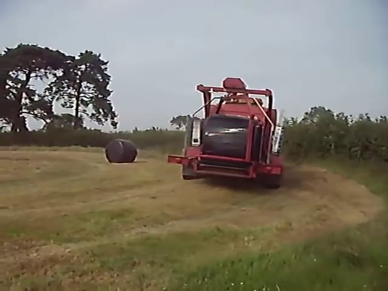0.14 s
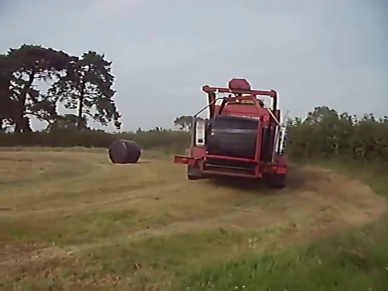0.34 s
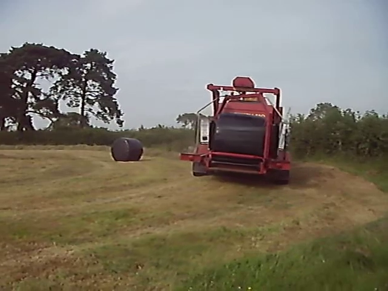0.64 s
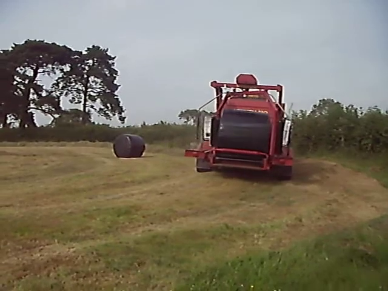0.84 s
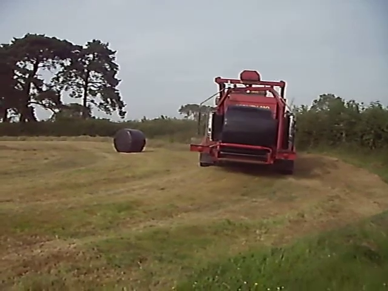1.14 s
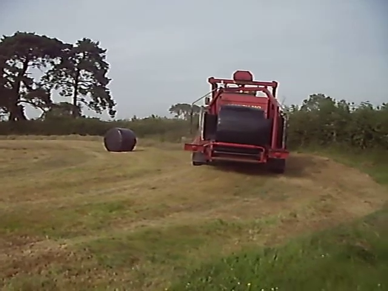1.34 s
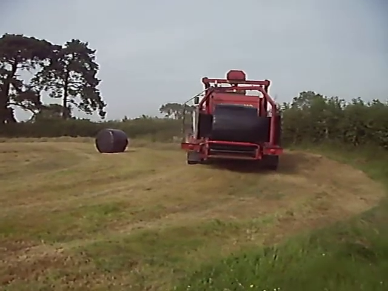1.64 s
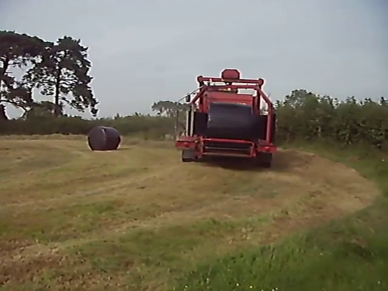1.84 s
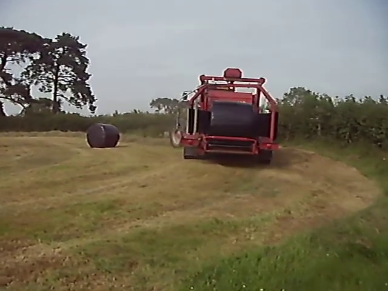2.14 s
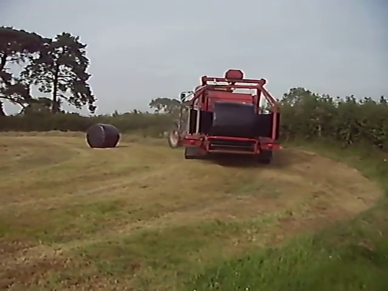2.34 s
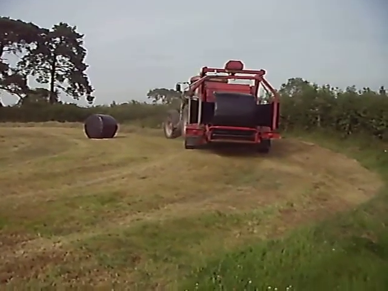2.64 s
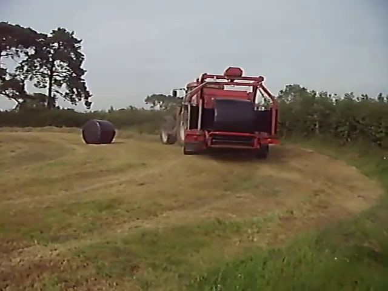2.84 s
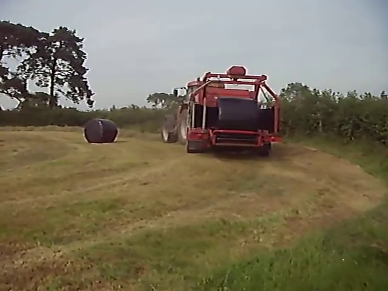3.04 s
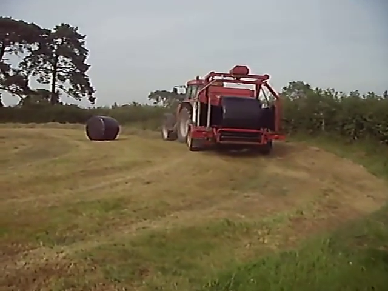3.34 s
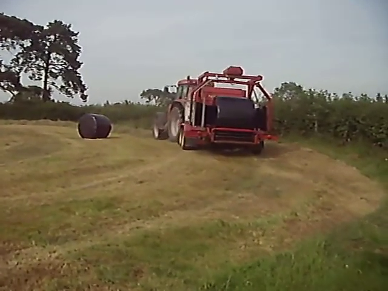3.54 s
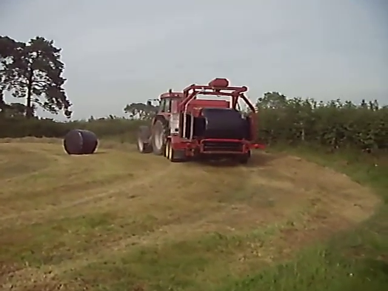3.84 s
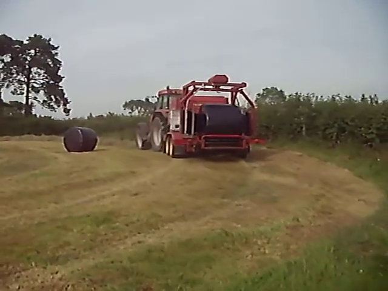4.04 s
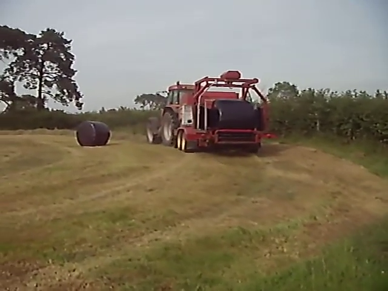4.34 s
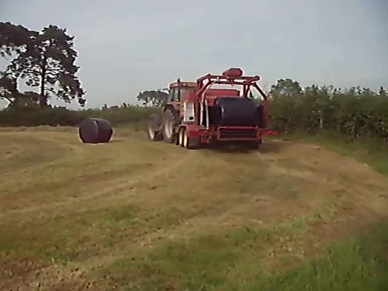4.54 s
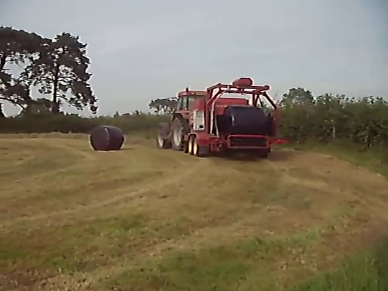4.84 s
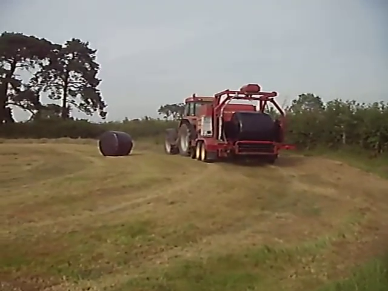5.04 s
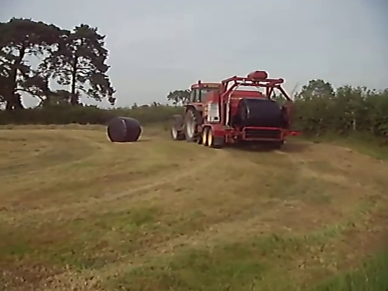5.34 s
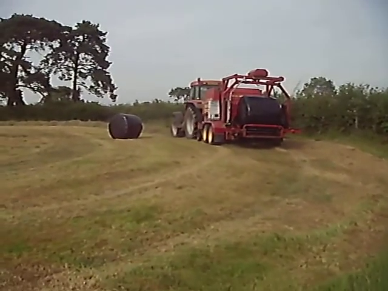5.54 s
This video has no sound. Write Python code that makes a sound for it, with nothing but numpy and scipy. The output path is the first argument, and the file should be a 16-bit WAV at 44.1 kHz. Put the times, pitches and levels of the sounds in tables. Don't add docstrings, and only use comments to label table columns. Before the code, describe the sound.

Dull, narrow-band outdoor clatter of a working baler behind a droning tractor, swamped mid-way by distorted wind buffeting, with faint squeaks late.

```python
import sys
import numpy as np
from scipy import signal
from scipy.io import wavfile
from scipy.ndimage import uniform_filter1d

SR = 44100
rng = np.random.default_rng(int(sys.argv[2]) if len(sys.argv) > 2 else 0)


def log_audio(samples):
    frames = np.atleast_2d(samples).T
    limited = np.clip(frames, -1, 1)
    pcm = np.round(limited * 32767).astype(np.int16)
    wavfile.write(sys.argv[1], SR, pcm)


def nominal_scale(level):
    x = np.asarray(level, float) / 20
    return 10 ** x


N = 251370

# (time [s], drone level [dB])
ENGINE = [
    (0, -16),
    (.6, -22),
    (1.2, -21),
    (1.7, -25.5),
    (3.2, -21.5),
    (4.1, -26.5),
    (4.6, -27.5),
    (5.3, -21),
    (5.7, -27.5),
]
# (frequency [Hz], width [Hz], level [dB])
EXHAUST_TONES = [(555, 102, 5), (649, 167, -1.5)]
# (frequency [Hz], width [Hz], level [dB])
GEARBOX_TONES = [(914, 85, 0.5), (1101, 180, -0.5), (1180, 14, -4.5)]
# (frequency [Hz], level [dB])
GEAR_WHINES = [(608.3, -36), (974.4, -39), (1166, -41), (2050, -43), (2169, -44)]
# (frequency [Hz], level per Hz [dB])
CHAIN_COLOUR = [(700, -0.5), (1000, 2.5), (1600, -3.5), (2100, -2), (2600, 0.5), (3200, -13.5),
                (3700, -32.5), (4300, -10)]
# (frequency [Hz], width [Hz], level [dB])
PANELS = [(1070, 220, -11.5), (1330, 62, -1.5), (1893, 190, -0.5), (2176, 200, 5), (2483, 56, 6),
          (3156, 200, 3.5), (3610, 150, 0.5)]
# (time [s], blow [dB], weight of the low panels [dB])
HARD_TURNS = [(0.033, -10, 4), (.652, -13.5, 3), (0.773, -12.5, -6), (.903, -18.5, 15), (1.024, -13, 4),
              (1.271, -14.5, -2), (1.771, -13.5, -3), (2.009, -10.5, -12), (2.49, -8.5, -5),
              (2.749, -9, -2.5), (3.383, -11.5, -9.5), (3.485, -8, -12.5), (3.732, -11, -2),
              (3.974, -10, -13.5), (4.103, -9, -7.5), (4.219, -10.5, -2), (4.335, -11.5, -10.5),
              (4.717, -10, -6.5), (4.961, -9.5, -16), (5.087, -11, -4), (5.207, -14, 5), (5.577, -15.5, 8)]
# (time [s], gust level [dB])
GUSTS = [(0.0, -21.5), (0.35, -23), (1.29, -18.5), (1.35, -7), (1.4, -17.5), (2.2, -11.5), (3.02, -20),
         (3.3, -28), (3.33, -21.5), (3.71, -19.5), (3.78, -12.5), (3.81, -19.5), (3.86, -18.5),
         (4.22, -15.5), (4.64, -23), (4.9, -19), (4.97, -20.5), (5.7, -19)]
# (middle [s], length [s], level [dB], swirl frequency [Hz])
BUFFETS = [(1.314, 0.017, -4, 260.3), (1.343, 0.016, -5.5, 120.3), (1.374, 0.026, -4.5, 350),
           (1.458, 0.015, -6, 359.8), (1.54, 0.016, -3, 299.2), (1.698, 0.036, -4, 321),
           (1.725, 0.014, -7, 259.1), (1.858, 0.035, -5.5, 330), (1.904, 0.03, -5.5, 230.3),
           (2.013, 0.047, -2, 339.8), (2.083, 0.057, 0, 340.2), (2.145, .045, -4.5, 369.7),
           (2.2, .075, -5.5, 299.1), (2.295, .09, -2.5, 280), (2.39, 0.051, 2.5, 299.5),
           (2.458, 0.078, 7, 360), (2.535, 0.1, 2.5, 320), (2.622, 0.045, -6, 280.4),
           (2.668, 0.032, 1, 358.7), (2.762, 0.021, -5.5, 249.8), (2.823, .078, 0, 320.5),
           (2.91, 0.071, -0.5, 290), (2.978, 0.034, -4, 309.8), (3.01, 0.016, -2.5, 300.7),
           (3.052, .03, 0.5, 360), (3.885, .06, -2.5, 360), (3.931, 0.038, -7.5, 260.4),
           (4.015, 0.051, -3.5, 350), (4.066, 0.045, -4, 340), (4.188, 0.038, -8.5, 170.1)]
# (middle [s], length [s], level [dB])
PUFFS = [(0.058, 0.011, -10.5), (0.085, 0.0082, -7.5), (.83, 0.0018, -9), (1.088, .012, -12),
         (1.424, .007, -2.5), (1.501, 0.011, -5), (1.58, .011, -6.5), (1.633, 0.0044, -7),
         (1.801, 0.026, -8), (1.829, .015, -9), (1.941, 0.0064, -5.5), (1.96, .012, -6), (2.703, 0.014, -5),
         (2.718, 0.0042, -7), (3.381, .009, -3.5), (3.495, 0.013, -9.5), (3.733, .009, -6),
         (3.766, .014, -4), (3.975, .02, -7.5), (4.12, .018, -11.5), (4.251, .02, -8.5), (4.279, 0.017, -7),
         (4.308, 0.017, -6), (4.728, .005, -9.5), (4.861, 0.022, -12.5), (4.905, 0.032, -6.5),
         (5.188, .022, -7.5), (5.382, 0.006, -4.5), (5.429, 0.012, -4.5), (5.585, .02, -4.5)]
# (middle [s], length [s], frequency [Hz], level [dB])
JOLTS = [
    (.652, .0018, 952, -4),
    (0.831, .003, 299, -2.5),
    (.946, 0.0022, 398, -5),
    (1.029, 0.0017, 699, -5),
    (3.093, 0.0017, 694, -3.5),
    (3.382, .005, 149, -1.5),
    (4.963, .0022, 990, -3),
    (5.264, 0.0018, 800, -3),
]
# (middle [s], length [s], frequency [Hz], level [dB])
SQUEAKS = [
    (4.528, 0.013, 2270, -18.5),
    (4.557, 0.014, 2340, -20),
    (4.746, 0.005, 2190, -17.5),
    (4.756, 0.0066, 2156, -11),
    (4.771, .013, 2320, -11.5),
]

FIRING_HZ, SHAFT_HZ = 41.2, 8.13
GEAR_DB, GEAR_DB_PER_S = -23, .5
CHAIN_DB, CHAIN_DB_PER_S = -20, 0.1853
MASK_FROM_DB = -22
MASKING = 0.49
FIRST_TURN_S, TURN_S, TURN_JITTER_S = .035, .123, .004
TURN_DB, TURN_SPREAD_DB, TURN_LOW_DB = -18.5, 2, 4
RUMBLE_DB, RUSH_DB, RUSH_PER_DB = 1, -7.5, 0.51
HEAVE_DB, PUSH_DB, LUMPS_DB = -6.5, -3, 2.5
PUFF_HZ = 270.5
RAIL, CEILING = 0.71, .707


def level(x, db):
    return x * nominal_scale(db) / np.sqrt(np.mean(x ** 2))


def noise():
    return rng.standard_normal(N)


def curves(table):
    s, *columns = np.transpose(table)
    return [np.interp(np.arange(N) / SR, s, c) for c in columns]


def band(x, hz, width):
    return signal.lfilter(*signal.iirpeak(hz, hz / width, SR), x)


def twice(x, hz, width):
    return band(band(x, hz, width), hz, width)


def ring(x, modes):
    return sum((-1) ** k * nominal_scale(db) * band(x, hz, width) for k, (hz, width, db) in enumerate(modes))


def walk(rate):
    hold = int(SR / rate)
    steps = np.repeat(rng.standard_normal(N // hold + 1), hold)
    smooth = uniform_filter1d(uniform_filter1d(steps, hold), hold)
    return level(smooth[:N], 0)


def bumps(s, length, size, edge=0.023):
    out = np.zeros(N)
    for at, wide, height in zip(s, length, size):
        first = max(int((at - wide) * SR), 0)
        last = min(int((at + wide) * SR), N)
        i = np.arange(first, last)
        ramp = np.clip(.5 + (wide / 2 - np.abs(i / SR - at)) / min(wide, edge), 0, 1)
        out[i] += height * np.sin(np.pi / 2 * ramp) ** 2
    return out


def clicks(rate, spread_db):
    hit = rng.random(N) < rate / SR
    sizes = nominal_scale(spread_db * rng.exponential(size=N))
    return level(hit * np.sign(noise()) * sizes, 0)


def tractor(drone_db, gear_db):
    phase = np.cumsum(FIRING_HZ * (1 + 0.017 * walk(20))) / SR
    puff = .5 + np.exp(-(phase % 1) / 0.45)
    gas = noise() * puff * nominal_scale(0.54 * walk(8.2))
    drone = level(ring(gas, EXHAUST_TONES), -0.25) * nominal_scale(drone_db)
    exhaust = level(twice(gas, 140., 170.), -26)
    throb = nominal_scale(walk(14))
    gears = level(ring(noise() * throb, GEARBOX_TONES), -2.0) * nominal_scale(gear_db)
    load = nominal_scale(0.28 * (drone_db - drone_db.mean()))
    whine = 0
    for hz, db in GEAR_WHINES:
        loudness = nominal_scale(db + 2.4 * walk(3.26))
        cycles = np.cumsum(hz * (1 + 0.00271 * walk(7))) / SR
        whine = whine + loudness * np.sin(2 * np.pi * cycles)
    return drone + exhaust + gears + np.sqrt(2) * load * whine


def turns():
    count = int(N / SR / TURN_S) + 1
    chance = rng.standard_normal((count, 3)).T
    times = FIRST_TURN_S + TURN_S * np.arange(count) + TURN_JITTER_S * chance[0]
    blow_db = TURN_DB + TURN_SPREAD_DB * chance[1]
    low_db = TURN_LOW_DB + TURN_SPREAD_DB * chance[2]
    rows = np.array([times, blow_db, low_db]).T
    hard_s = np.transpose(HARD_TURNS)[0]
    rows[np.rint((hard_s - FIRST_TURN_S) / TURN_S).astype(int)] = HARD_TURNS
    return rows.T


def chain_rattle():
    hz, db = np.transpose(CHAIN_COLOUR)
    links, chains = clicks(3500, spread_db=2.0), 0
    for centre in 750 * 2 ** np.arange(0, 2.6, 1 / 3):
        colour_db = np.interp(np.log(centre), np.log(hz), db) + 1.0 * walk(8.7)
        chains = chains + nominal_scale(colour_db) * band(links + 1.09 * noise(), centre, centre / 5)
    hum = level(ring(links, PANELS[2:]), -14.5) * nominal_scale(2 * walk(8))
    return level(level(chains, 0) + hum, 0)


def baler(rattle_db):
    s, blow_db, low_db = turns()
    chains = chain_rattle()
    slap = bumps(s, np.full(len(s), .011), nominal_scale(blow_db))
    shake = signal.lfilter([1], [1, -np.exp(-1 / (0.025 * SR))], slap) / (0.026 * SR)
    tines = 1 + 0.074 * np.cos(2 * np.pi * 3 * SHAFT_HZ * (np.arange(N) / SR - .03))
    weight = bumps(s, np.full(len(s), .013), nominal_scale(blow_db + low_db))
    contacts = clicks(3700, spread_db=-0.5)
    high_size = ring(contacts, PANELS[2:]).std()
    low_size = ring(contacts, PANELS[:2]).std()
    high = ring(contacts * slap, PANELS[2:]) / high_size
    low = ring(contacts * weight, PANELS[:2]) / low_size
    panels = high + nominal_scale(-4) * low
    motion = nominal_scale(rattle_db - 1.5) * tines + nominal_scale(1.5) * shake + nominal_scale(-13.5) * slap
    return chains * motion + nominal_scale(-11) * panels


def wind(gust_db):
    rumble = level(band(noise(), 50., 99.0), -1.65) * nominal_scale(gust_db + RUMBLE_DB + 2.1 * walk(18))
    rush_db = RUSH_PER_DB * gust_db + RUSH_DB + 2.0 * walk(35)
    rush = level(twice(noise(), 170.0, 300.), -5.5) * nominal_scale(rush_db)
    eddies = list(BUFFETS) + [(*p, PUFF_HZ) for p in PUFFS]
    s, length, db, hz = np.transpose(sorted(eddies))
    swell = bumps(s, length, nominal_scale(db - 4.5), edge=0.0064)
    pitch = np.interp(np.arange(N) / SR, s, hz) * 2 ** (.8 * walk(400) - .25)
    swirl = np.sqrt(2) * np.sin(2 * np.pi * np.cumsum(pitch) / SR)
    broken = level(twice(noise(), 223.0, 500.), -4.0) * swell
    broken = broken + level(twice(noise(), 555.0, 610.0), -2.35) * swell ** 1.76
    thump = level(twice(noise(), 122.6, 130.), -5.5) * swell
    flutter = nominal_scale(2.0 * walk(90) + LUMPS_DB * walk(45))
    heave = level(band(noise(), 55., 45.0), HEAVE_DB) * uniform_filter1d(swell, size=1500)
    s, length, db = np.transpose(PUFFS)
    shove = nominal_scale(db + PUSH_DB) * (-1) ** np.arange(len(s))
    push = bumps(s, np.minimum(length, .005), shove, edge=0.00091)
    return rumble + heave + push + rush + thump + flutter * (nominal_scale(-1.5) * swell * swirl + broken)


def jolts_and_squeaks(table):
    t = np.arange(N) / SR
    out = np.zeros(N)
    for s, wide, hz, db in table:
        swell = bumps([s], [wide], [nominal_scale(db)])
        out += np.sqrt(2) * swell * np.cos(2 * np.pi * hz * (t - s))
    return out


def scene():
    t = np.arange(N) / SR
    drone_db, = curves(ENGINE)
    gust_db, = curves(GUSTS)
    duck_db = MASKING * np.maximum(gust_db - MASK_FROM_DB, 0)
    engine = tractor(drone_db, GEAR_DB + GEAR_DB_PER_S * t - duck_db)
    machine = engine + baler(CHAIN_DB + CHAIN_DB_PER_S * t - duck_db)
    bursts = jolts_and_squeaks([*SQUEAKS, *JOLTS])
    return (machine + bursts + wind(gust_db))[None]


def band_limit(x):
    return signal.sosfilt(signal.butter(12, 15830, fs=SR, output="sos"), x)


def record(dry):
    soft = signal.sosfilt(signal.butter(6, 3700, fs=SR, output="sos"), dry)
    edge = signal.cheby2(9, 48, 4960, fs=SR, output="sos")
    every_fifth = 5. * (np.arange(N) % 5 == 0)
    samples = np.clip(soft, -RAIL, RAIL) * every_fifth
    narrow = signal.sosfiltfilt(edge, samples)
    return band_limit(np.clip(narrow, -CEILING, CEILING))


dry = scene()
out = record(dry)
log_audio(out)
```